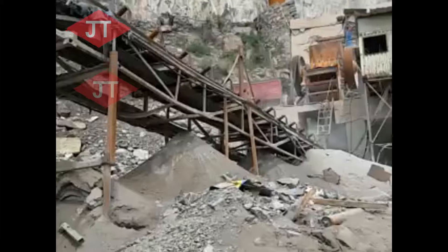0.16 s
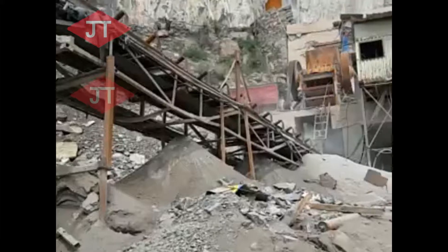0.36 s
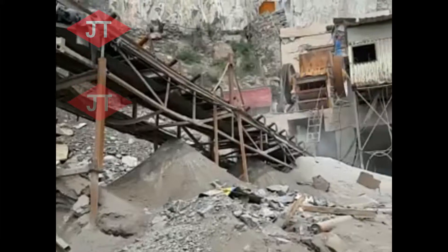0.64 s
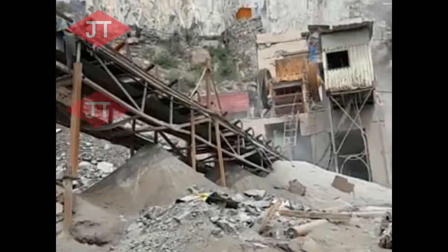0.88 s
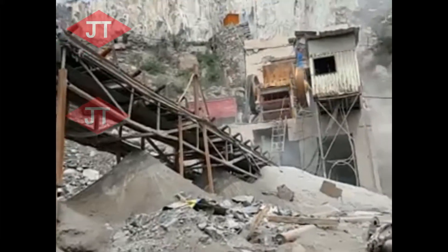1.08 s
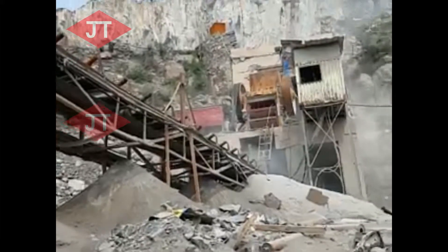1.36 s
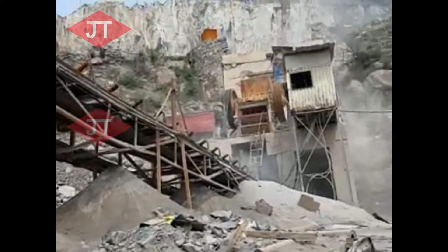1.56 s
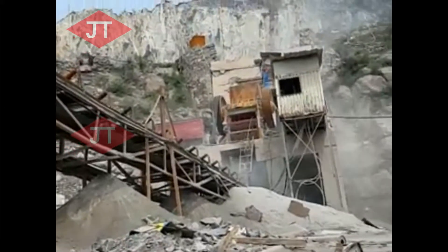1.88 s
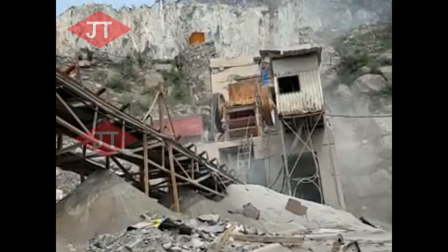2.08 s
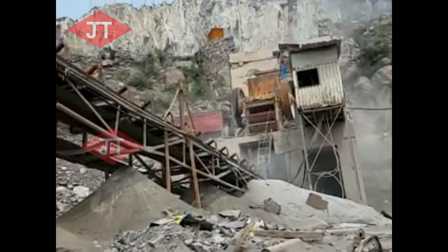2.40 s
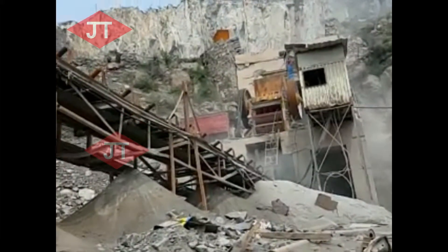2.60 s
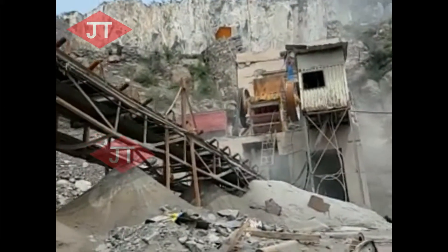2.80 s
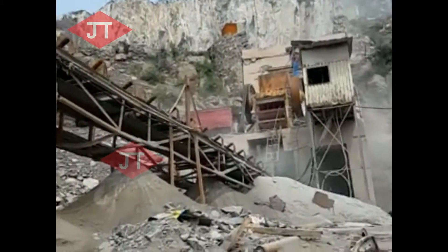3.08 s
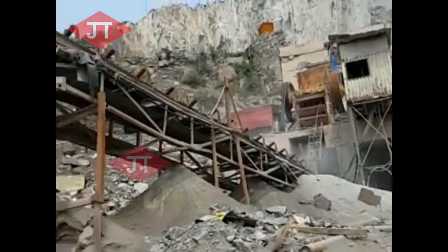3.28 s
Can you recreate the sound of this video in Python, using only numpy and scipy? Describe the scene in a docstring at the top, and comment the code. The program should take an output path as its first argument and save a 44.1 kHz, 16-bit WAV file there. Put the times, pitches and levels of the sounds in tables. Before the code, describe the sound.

Jaw crusher grinding rock in an open quarry, rumbling, clattering, with regular high conveyor chirps

```python
"""A jaw crusher in an open quarry, heard almost in mono; stone churns in a steady roar of shaped noise.
The jaw rumbles about three times a second in swells of low noise, over the sine hum of the drive.
Gravel rattles down the chute and stones clack as random impacts on short rings. Boulders knock as decaying
modes and rocks crack as splinter showers; the rock face and steelwork scatter echoes of these two.
Dry conveyor rollers chirp as fluttering tones. The sound fades in within the first quarter second."""
import sys
import numpy as np
from scipy import signal
from scipy.fft import rfft, irfft
from scipy.io import wavfile
from scipy.ndimage import uniform_filter1d, minimum_filter1d

SR = 44100
rng = np.random.default_rng(int(sys.argv[2]) if len(sys.argv) > 2 else 0)


def dump_mix(stems):
    """Bounce the given channels to the path in sys.argv[1] as a 16-bit WAV at rate SR."""
    frames = np.atleast_2d(stems).T  # one column per channel
    limited = np.clip(frames, -1, 1)  # hard clip at full scale
    pcm = np.round(limited * 32767).astype(np.int16)
    wavfile.write(sys.argv[1], SR, pcm)


N = 152145
TIME, FREQ = np.arange(N) / SR, np.fft.rfftfreq(N, 1 / SR)  # s, Hz


def amp(db):
    """Decibels to gain."""
    return 10 ** (np.asarray(db) / 20)


def unit(x):
    """Scales to an rms of 1."""
    return x / np.sqrt(np.mean(x ** 2) + 1e-20)


def read(points, hz):
    """Reads a spectrum on a log-frequency axis."""
    f, value = np.transpose(points)
    return np.interp(np.log(hz + 1), np.log(f + 1), value)


def colour(x, db):
    """Filters a full-length sound by a gain per frequency."""
    return irfft(rfft(x) * amp(db), N)


def add(mix, s, sound):
    """Mixes a sound in at a time in seconds."""
    part = mix[max(round(s * SR), 0):][:len(sound)]
    part += sound[:len(part)]


def drift(size):
    """Slow random wander of rms 1, smooth over size samples."""
    noise = rng.standard_normal(N)
    return unit(uniform_filter1d(uniform_filter1d(noise, size), size))


def burst(t, rise, length, fall):
    """Attack, hold and exponential release, all in seconds."""
    return np.minimum(t / rise, 1) * np.exp(-np.maximum(t - length, 0) / fall)


def clicks(per_s, spread_db):
    """Random impacts of either sign, many small and a few large."""
    size = amp(spread_db * np.minimum(rng.exponential(1, N), 4))
    return size * rng.choice([-1., 1.], N) * (rng.random(N) < per_s / SR)


PATCH_DB, FLICKER_DB = 1.38, 0.44  # rms wander of single patches, and of all frequencies together


def patchy(spectrum):
    """Noise whose level wanders in patches of time and frequency, as in a crowd of tumbling stones."""
    frames, bins = N // 128 + 5, 257
    real, imaginary, patches = rng.standard_normal((3, frames, bins))
    patches = uniform_filter1d(patches, size=10, axis=0)  # smooth in time
    patches = unit(uniform_filter1d(patches, size=7, axis=1))  # smooth in frequency
    flicker = unit(uniform_filter1d(rng.standard_normal(frames), size=5))[:, None]
    z = (real + 1j * imaginary) * amp(PATCH_DB * patches + FLICKER_DB * flicker)
    noise = signal.istft(z.T, nperseg=512, noverlap=384)[1][:N]
    return unit(colour(noise, read(spectrum, FREQ)))


# spectrum of gravel and larger stones on the chute: f/Hz, level/dB
RATTLE_SPECTRUM = [(200, -17), (600, 2), (1500, -1.5), (3000, 1), (4500, -9.5), (7500, -18.5), (9000, -24),
                   (11000, -38)]
GRAVEL_DB = -8.5  # against the treble of the churn
GRAVEL_PER_S, GRAVEL_SPREAD_DB, GRAVEL_RING_S = 450, 3.5, 0.0056


def gravel():
    """Pebbles rattle down the chute: random impacts on short rings in 20 pitch groups."""
    t, pebbles = TIME[:1024], np.zeros(N)
    for pitch in np.geomspace(500, 7000, 20):
        modes = pitch * rng.uniform(.6, 1.5, (6, 1))
        ring = np.sin(2 * np.pi * modes * t).sum(0) * np.exp(-t / GRAVEL_RING_S)
        hits = clicks(GRAVEL_PER_S / 20, GRAVEL_SPREAD_DB)
        pebbles += np.sqrt(pitch) * signal.oaconvolve(hits, ring)[:N]
    return amp(GRAVEL_DB) * unit(colour(pebbles, read(RATTLE_SPECTRUM, FREQ)))


STONES_DB = -5  # against the treble of the churn
STONES_PER_S, STONE_SPREAD_DB, STONE_RING_S = 60, 2.5, 0.0052
STONE_LOW_HZ, STONE_HIGH_HZ, STONE_OCTAVES = 790, 2576, .45  # centre pitches, scatter of modes around them
BOUNCE_S, BOUNCE_DB = .012, -8  # mean delay, level against the first hit


def stones(count=30, size=2048):
    """Fist-sized stones clack together at random, each with a few short modes and one bounce."""
    out, t = np.zeros(N), TIME[:size]
    for hz in np.geomspace(STONE_LOW_HZ, STONE_HIGH_HZ, count):
        modes = hz * 2 ** (STONE_OCTAVES * rng.standard_normal((8, 1)))
        signs = rng.choice([-1., 1.], modes.shape)
        clack = (signs * np.sin(2 * np.pi * modes * t)).sum(0) * np.exp(-t / STONE_RING_S)
        add(clack, BOUNCE_S * (.5 + rng.random()), amp(BOUNCE_DB) * clack)
        out += signal.oaconvolve(clicks(STONES_PER_S / count, STONE_SPREAD_DB), clack)[:N]
    return amp(STONES_DB) * unit(colour(out, read(RATTLE_SPECTRUM, FREQ)))


# rise and fall of the churning stone: t/s, body level/dB, treble level/dB
CHURN_LEVELS = [(.2, -18.5, -19), (.55, -17.5, -20.5), (.85, -17.5, -20.5), (.97, -15.5, -20.5),
                (1.1, -18.5, -22), (1.32, -17, -19), (1.42, -20, -22), (1.6, -16, -19.5),
                (1.78, -20.5, -19), (1.88, -18.5, -21), (2.03, -19, -20.5), (2.2, -20, -22.7),
                (2.32, -17.5, -20), (2.45, -19.3, -23), (2.6, -17, -21.5), (2.75, -19.5, -24),
                (3.03, -18.5, -23), (3.2, -17, -22.5), (3.45, -18, -20.5)]
# spectrum of the low body of the roar: f/Hz, level/dB
BODY_SPECTRUM = [(15, -30), (40, -12.5), (80, -5.5), (120, -2.5), (170, 0.5), (230, -2), (350, -2),
                 (600, -2.5), (850, -3), (1300, -10), (2200, -18.5), (5000, -65)]
# spectrum of the treble of the roar: f/Hz, level/dB
TREBLE_SPECTRUM = [(15, -50), (200, -36), (700, -6.5), (1200, -0.5), (2000, 1), (3000, -1.5), (4000, -7.5),
                   (5000, -12), (5900, -15), (6700, -14), (8200, -24.5), (9000, -33), (10200, -43),
                   (14000, -47.5)]


def churn():
    """The roar of tumbling stone: many blurred impacts, with single pebbles and stones on top."""
    s, body_db, treble_db = np.transpose(CHURN_LEVELS)
    body = amp(np.interp(TIME, s, body_db)) * patchy(BODY_SPECTRUM)
    bright = patchy(TREBLE_SPECTRUM) + gravel() + stones()
    return body + amp(np.interp(TIME, s, treble_db)) * bright


# strokes of the jaw: t/s at the middle, rumble level/dB
JAW_STROKES = [(.34, -27.5), (.68, -42), (.99, -32), (1.36, -27), (1.67, -35), (2.04, -40), (2.41, -25),
               (2.73, -26), (3.11, -32), (3.36, -31.5)]
# spectrum of the frame's rumble: f/Hz, level/dB
RUMBLE_SPECTRUM = [(15, -29), (30, -11), (45, 6), (60, 1), (80, 1), (160, -4.5), (500, -58)]
STROKE_WIDTH_S = 0.082  # standard deviation of each bell-shaped swell
HUM_HZ, HUM_DB, HUM_WAVER_HZ = 118, -35.5, 1.64


def jaw():
    """The frame rumbles with each stroke, over the hum of the drive."""
    swell = np.zeros(N)
    for s, db in JAW_STROKES:
        swell += amp(db) * np.exp(-.5 * ((TIME - s) / STROKE_WIDTH_S) ** 2)
    rumble = unit(colour(rng.standard_normal(N), read(RUMBLE_SPECTRUM, FREQ)))
    hum_hz = HUM_HZ + HUM_WAVER_HZ * drift(size=6000)
    hum = np.sqrt(2) * np.sin(2 * np.pi * np.cumsum(hum_hz) / SR)
    return swell * rumble + amp(HUM_DB) * hum


# resonances of the steel hopper and housing: f/Hz, width/Hz, level/dB
HOPPER_RESONANCES = [(156.6, 10, 2.5), (194, 8.8, 1), (249, 6.1, 2.5), (293, 21, 2), (454, 6, 5),
                     (640, 15, 3), (1134, 23, 3.5), (3846, 42, 5), (4430, 38, -1.5)]


def hopper(x):
    """The steel hopper and housing resonate, lifting narrow bands and slightly cutting one."""
    gain_db = np.zeros(len(FREQ))
    for hz, width, db in HOPPER_RESONANCES:
        gain_db += db / (1 + (2 * (FREQ - hz) / width) ** 2)
    return colour(x, gain_db)


# boulders knocking on the hopper: t/s, level/dB, length/s, main pitch f/Hz
BOULDER_KNOCKS = [(0.226, -22, 0.036, 254), (0.263, -22, 0.022, 390), (.268, -23, 0.05, 184),
                  (.29, -21.5, 0.016, 467), (0.329, -23, 0.015, 377), (0.425, -25, 0.019, 408),
                  (0.493, -18.5, 0.013, 462), (.59, -27, .03, 261), (0.596, -23, 0.061, 112),
                  (.686, -19, 0.03, 465), (.825, -20, .02, 253), (0.829, -21, 0.013, 443),
                  (.84, -25, 0.032, 145.4), (0.863, -22, 0.028, 440), (.89, -23, 0.018, 1095),
                  (.92, -21, 0.017, 862), (0.948, -21, .022, 717), (0.981, -20.5, 0.017, 627),
                  (.978, -21, 0.043, 185.5), (1.02, -20, .024, 1095), (1.048, -20.5, 0.019, 298.5),
                  (1.105, -23, .025, 149), (1.177, -18, 0.013, 843), (1.263, -28, .028, 556),
                  (1.284, -26, 0.039, 163), (1.318, -20, 0.02, 633), (1.469, -20.5, 0.015, 712),
                  (1.59, -25, .02, 499), (1.642, -23, 0.039, 120), (1.657, -32, .04, 211),
                  (1.673, -19, 0.019, 470), (1.675, -24, 0.032, 670), (1.705, -27, 0.033, 970),
                  (1.739, -16.5, 0.019, 528), (1.935, -18.5, 0.019, 530), (2.033, -20.5, .016, 466),
                  (2.244, -19.5, 0.018, 194), (2.255, -24.5, 0.016, 558), (2.29, -26, .018, 184),
                  (2.29, -17, .013, 816), (2.302, -17, .015, 467), (2.328, -19.5, 0.016, 413),
                  (2.361, -22, .025, 431), (2.38, -19.5, 0.041, 251), (2.383, -19, 0.017, 166),
                  (2.626, -20.5, 0.021, 469), (2.635, -17.5, .012, 800), (2.685, -21, .02, 163),
                  (2.702, -22, 0.018, 432), (2.862, -18, .02, 578), (3.03, -19, 0.022, 175),
                  (3.031, -20, 0.021, 105), (3.076, -22.5, 0.034, 120.5), (3.174, -24, 0.061, 121),
                  (3.198, -25, 0.023, 678), (3.308, -21.5, .04, 145.3), (3.361, -24, 0.018, 303),
                  (3.364, -19.5, 0.016, 155), (3.374, -26, 0.051, 414)]
KNOCK_RISE_S, KNOCK_FALL_S = 0.0039, 0.0099
KNOCK_MODES, KNOCK_OCTAVES, KNOCK_SCATTER_DB = 14, .7, -3.5  # lesser modes: count, spread, level against main
KNOCK_WAVER_OCTAVES = 0.056  # unsteadiness of the pitch


def knocks(size=8192):
    """Each boulder lands with a hollow knock: one wavering main mode among a scatter of lesser ones."""
    out, t = np.zeros(N), TIME[:size]
    waver = 2 ** (KNOCK_WAVER_OCTAVES * drift(size=500))
    for s, db, length, hz in BOULDER_KNOCKS:
        turns = np.cumsum(hz * np.interp(s + t, TIME, waver)) / SR
        main = np.sin(2 * np.pi * (turns + rng.random()))
        ratios = 2 ** (KNOCK_OCTAVES * rng.standard_normal((KNOCK_MODES, 1)))
        phases = rng.random((KNOCK_MODES, 1))
        lesser = np.sin(2 * np.pi * (ratios * turns + phases)).sum(0)
        env = burst(t, KNOCK_RISE_S, length, KNOCK_FALL_S)
        ring = env * (unit(main) + amp(KNOCK_SCATTER_DB) * unit(lesser))
        # equal energy for equal envelopes, however the modes add up
        add(out, s, amp(db) * ring * np.linalg.norm(env) / np.linalg.norm(ring))
    return out


ECHO_DB, ECHO_T60_S = -6, 0.37  # level against the direct sound, time to fall 60 dB


def quarry(x):
    """Scattered echoes from the rock face and the steelwork, over paths at least 8 ms longer than direct."""
    t = TIME[:SR // 2]
    present = (rng.random(len(t)) < .05) & (t > .008)
    taps = rng.standard_normal(len(t)) * present * amp(-60 * t / ECHO_T60_S)
    return x + amp(ECHO_DB) * signal.fftconvolve(x, taps / np.linalg.norm(taps))[:N]


# chirps of the dry rollers, one per turn and a few strays:
# t/s, level/dB, f/Hz, length/s, octave level against the main tone/dB
ROLLER_CHIRPS = [(0.28, -19, 2730, 0.032, -18), (0.436, -15, 2730, 0.015, -16),
                 (.597, -16.5, 2800, 0.015, -21), (0.75, -19, 2840, .015, -16),
                 (0.904, -19.5, 2770, 0.018, -18), (1.045, -17, 2765, 0.037, -19),
                 (1.213, -22, 2730, 0.017, -18), (1.264, -20, 2870, 0.017, -13),
                 (1.355, -15, 2770, 0.02, -16), (1.508, -16.5, 2730, 0.018, -20),
                 (1.661, -18, 2800, 0.019, -19), (1.733, -20, 2780, .016, -20),
                 (1.825, -16.5, 2816, 0.018, -18), (1.98, -21.5, 2840, 0.032, -18),
                 (2.125, -13, 2790, .019, -20), (2.546, -19, 2890, .017, -20),
                 (2.747, -18.5, 2780, 0.014, -12), (2.893, -19.5, 2780, 0.028, -13),
                 (3.054, -23.5, 2870, .026, -18), (3.206, -16, 2790, 0.024, -19),
                 (3.223, -20, 2830, .021, -14), (3.368, -16, 2820, 0.011, -18)]
CHIRP_RISE_S, CHIRP_STOP_S = 0.0048, 0.0033
CHIRP_FLUTTER_DB, CHIRP_JITTER_HZ = 1.5, 35  # rms wander of level and pitch


def roller():
    """A dry bearing catches on each turn, sings with a stick-slip flutter and a faint octave, and stops short."""
    out = np.zeros(N)
    jitter = CHIRP_JITTER_HZ * drift(size=120)
    flutter = amp(CHIRP_FLUTTER_DB * drift(size=100))
    for s, db, hz, length, octave_db in ROLLER_CHIRPS:
        near = (TIME > s) & (TIME < s + length)
        t = TIME[near] - s
        phase = 2 * np.pi * np.cumsum(hz + jitter[near]) / SR
        tone = np.sin(phase) + amp(octave_db) * np.sin(2 * phase)
        env = np.minimum(t / CHIRP_RISE_S, 1) * np.minimum((length - t) / CHIRP_STOP_S, 1)
        out[near] += amp(db) * env * flutter[near] * tone
    return out


# rocks breaking in the jaw: t/s, level/dB, length/s, treble tilt/dB per octave
ROCK_CRACKS = [(.306, -16, 0.02, -1.5), (0.393, -15, 0.021, 1), (0.43, -22, 0.038, 7.5),
               (0.489, -18.5, 0.018, -2), (0.574, -20.5, .015, -2.5), (0.688, -20, 0.044, 1),
               (.785, -17.5, .012, -3), (0.859, -19, 0.033, -6), (0.924, -21.5, 0.027, -3),
               (0.967, -18, 0.025, -10.5), (1.016, -21, 0.027, -12), (1.119, -26, .015, -3),
               (1.171, -20, 0.013, -4), (1.216, -21, 0.05, 2), (1.293, -17, 0.011, -0.5),
               (1.462, -13.5, 0.028, 0), (1.559, -17.5, 0.031, 1), (1.609, -17, 0.008, 0),
               (1.65, -16, 0.019, -6), (1.69, -17, 0.015, 2), (1.72, -16.5, .025, -2.5),
               (1.775, -21.5, 0.04, 9), (2.135, -24.5, 0.014, 3), (2.246, -21, 0.028, -5),
               (2.273, -22.5, 0.017, -0.5), (2.302, -20.5, 0.011, 8.5), (2.315, -18.5, .012, 10),
               (2.336, -19, 0.013, 5), (2.356, -23.5, 0.017, 0), (2.443, -25.5, .014, 8.5),
               (2.527, -19.5, 0.023, -1.5), (2.62, -15.5, .008, 2), (2.639, -17, 0.012, 0.5),
               (2.666, -24, 0.011, 1), (2.768, -21, 0.035, 1), (2.826, -23.5, 0.029, 3),
               (2.927, -18, 0.01, -1.5), (2.934, -21.5, 0.013, 4), (3.247, -27, .015, -2),
               (3.318, -24.5, 0.047, -1.5)]
# spectrum of an untilted crack: f/Hz, level/dB
CRACK_COLOUR = [(25, -12), (150, -5), (500, -6.5), (1000, -1.5), (2000, 1), (3000, -3), (4200, -7),
                (5500, -16), (7500, -20), (9000, -31), (11000, -63)]
CRACK_RISE_S, CRACK_FALL_S, TILT_PIVOT_HZ = 0.0011, 0.012, 2000
SPLINTERS_PER_S, SPLINTER_SPREAD_DB = 6000, 3
SNAP_DB, SNAP_S = 2, 0.0018  # the first fracture stands out of the shower


def cracks(size=8192):
    """Each breaking rock is a snap and a short shower of splinters."""
    out, t, hz = np.zeros(N), TIME[:size], np.fft.rfftfreq(size, 1 / SR)
    octaves = np.clip(np.log2((hz + 1) / TILT_PIVOT_HZ), -2, 1)
    snap = amp(SNAP_DB * np.exp(-t / SNAP_S))
    for s, db, length, tilt_db in ROCK_CRACKS:
        shape_db = read(CRACK_COLOUR, hz) + tilt_db * octaves
        splinters = clicks(SPLINTERS_PER_S, SPLINTER_SPREAD_DB)[:size]
        shower = unit(irfft(rfft(splinters) * amp(shape_db)))
        add(out, s, amp(db) * snap * shower * burst(t, CRACK_RISE_S, length, CRACK_FALL_S))
    return out


# level of the side signal: f/Hz, gain/dB
SIDE_LEVEL = [(30, -17), (70, -24), (160, -53), (260, -68), (450, -65), (750, -68), (1200, -33.5),
              (2000, -24.5), (4000, -22.5), (8000, -18.5), (11000, -6)]
# lean between the two channels: f/Hz, left minus right level/dB
LEFT_RIGHT_BALANCE = [(1200, 0), (2300, -.55), (4100, -.9), (7500, -1), (13000, -3)]
DIFFUSE_SHARE = 0.88  # weight of unrelated churn in the side signal; the rest follows the middle


def scene():
    """The whole plant, almost in mono: a faint wide hiss in the treble and a trace of low noise at the sides."""
    mid = hopper(churn() + jaw() + quarry(knocks() + cracks())) + roller()
    related = signal.hilbert(mid).imag  # the middle, a quarter turn out of phase
    diffuse = np.sqrt(1 - DIFFUSE_SHARE) * related + np.sqrt(DIFFUSE_SHARE) * churn()
    side = colour(diffuse, read(SIDE_LEVEL, FREQ))
    lean_db = read(LEFT_RIGHT_BALANCE, FREQ) / 2
    return np.array([colour(mid, lean_db) + side, colour(mid, -lean_db) - side])


# fade-in from near silence: t/s, level/dB
OPENING_FADE = [(0, -87), (.158, -73), (.172, -36), (.187, -35), (.197, -16), (.214, -12.5), (.227, 0.5),
                (.245, 1)]
CEILING, LIMITER_SIZE = .93, 89  # peak amplitude, samples
EDGE_HZ = 14300  # top of the band


def record(dry):
    """Fade-in, a quick limiter on the highest peaks and the band limit."""
    x = dry * amp(np.interp(TIME, *np.transpose(OPENING_FADE)))
    room = CEILING / np.maximum(abs(x).max(0), CEILING)
    x = x * uniform_filter1d(minimum_filter1d(room, LIMITER_SIZE), LIMITER_SIZE)
    lowpass = signal.firwin(511, EDGE_HZ, window=("kaiser", 9), fs=SR)
    return signal.oaconvolve(x, lowpass[None], "same")


dry = scene()
out = record(dry)
dump_mix(out)
```